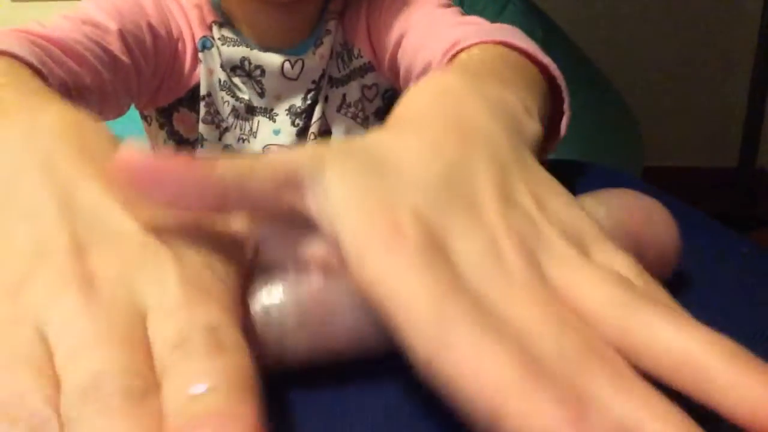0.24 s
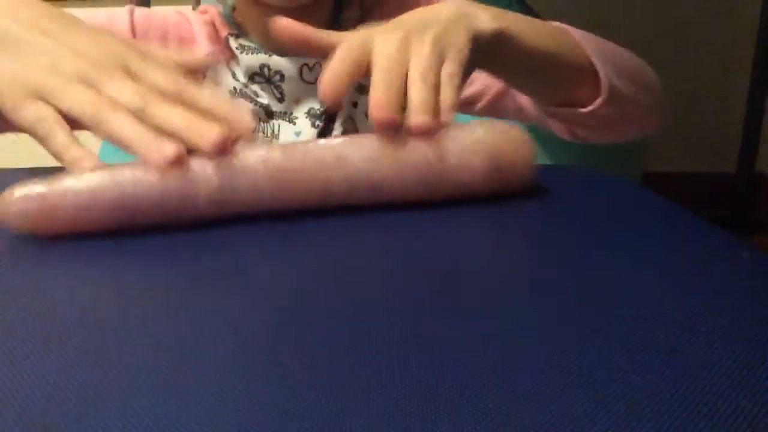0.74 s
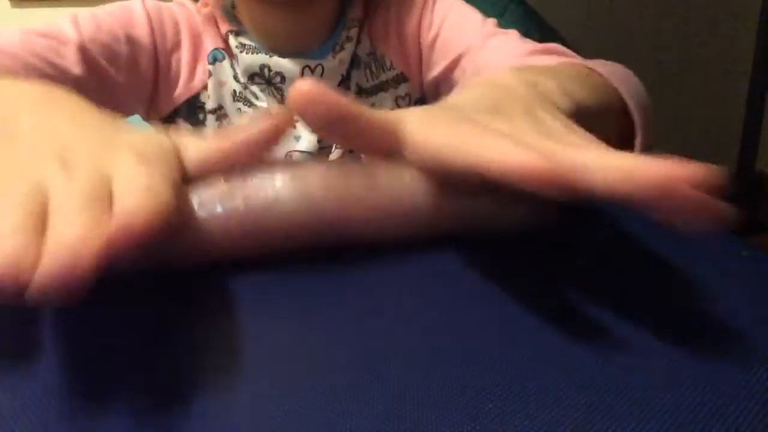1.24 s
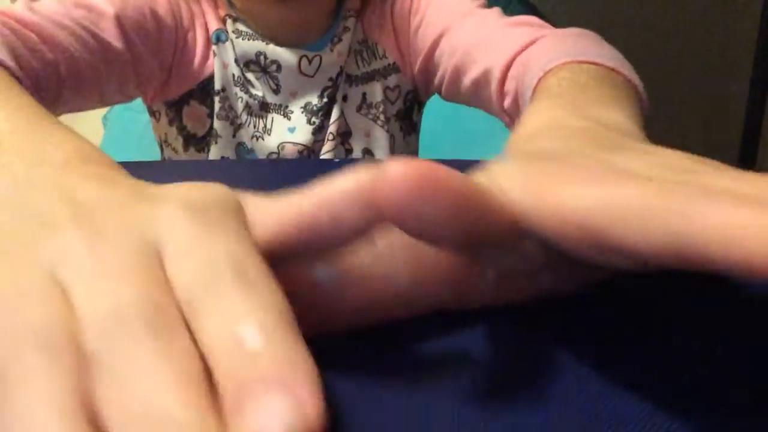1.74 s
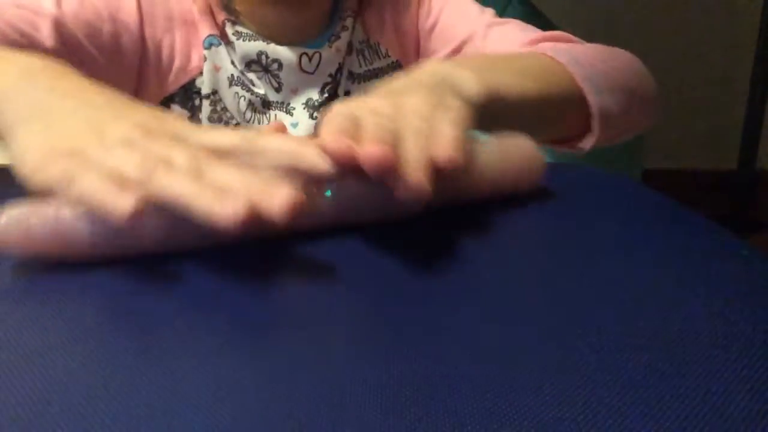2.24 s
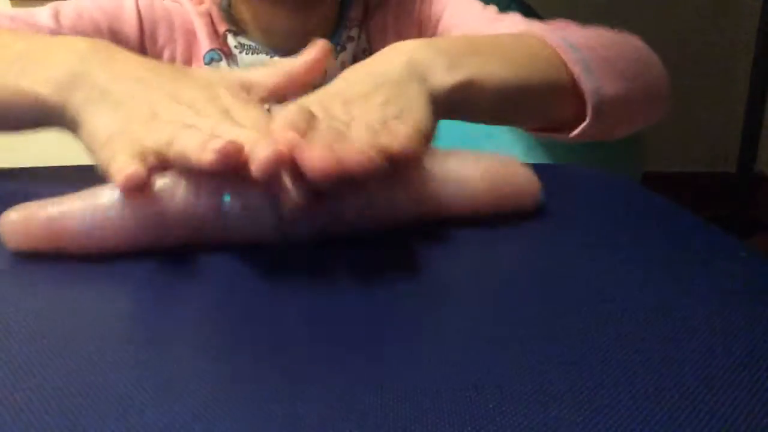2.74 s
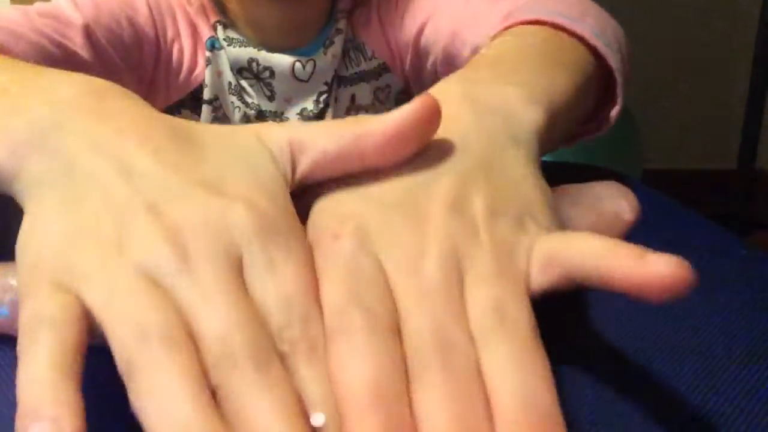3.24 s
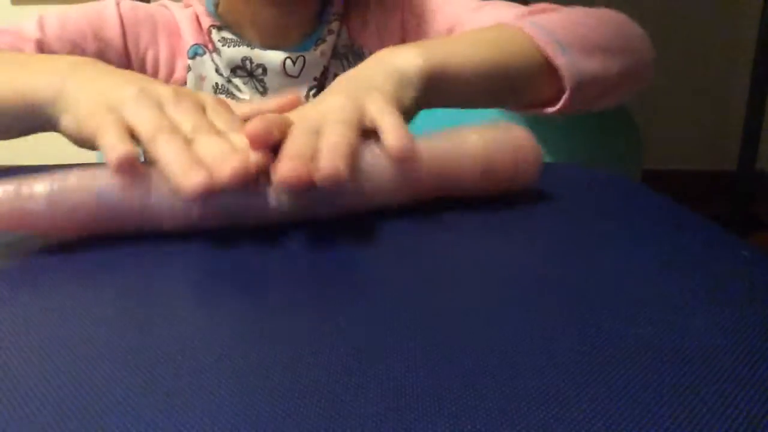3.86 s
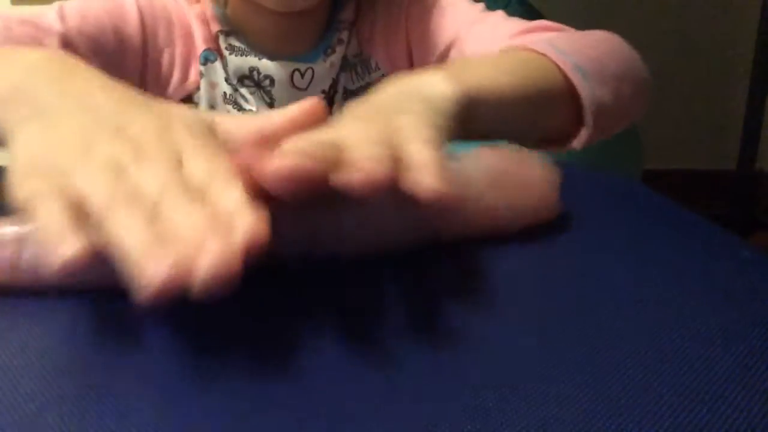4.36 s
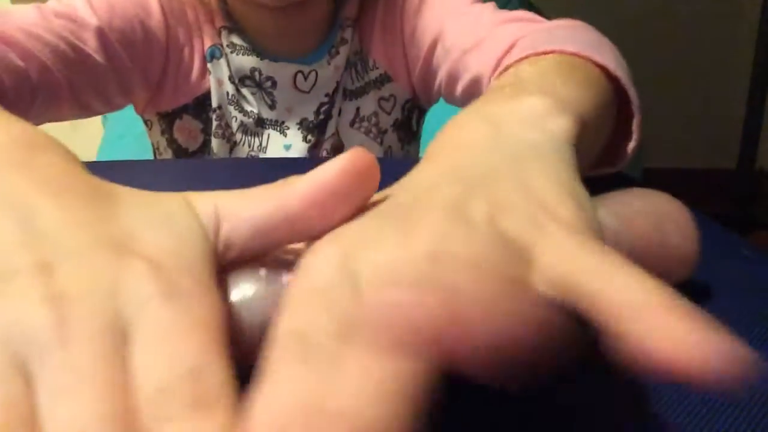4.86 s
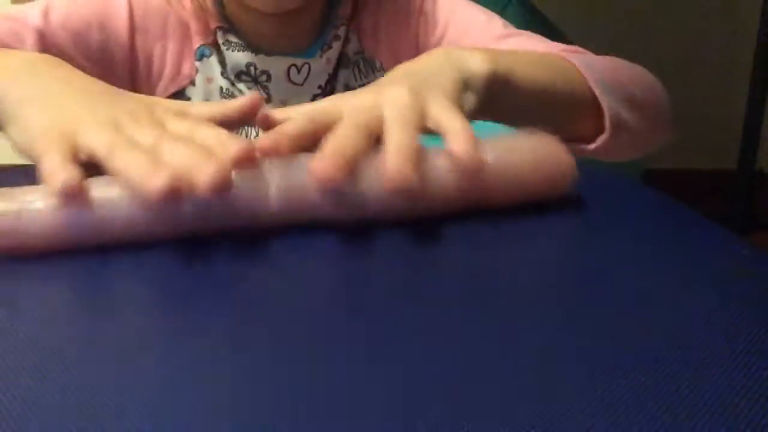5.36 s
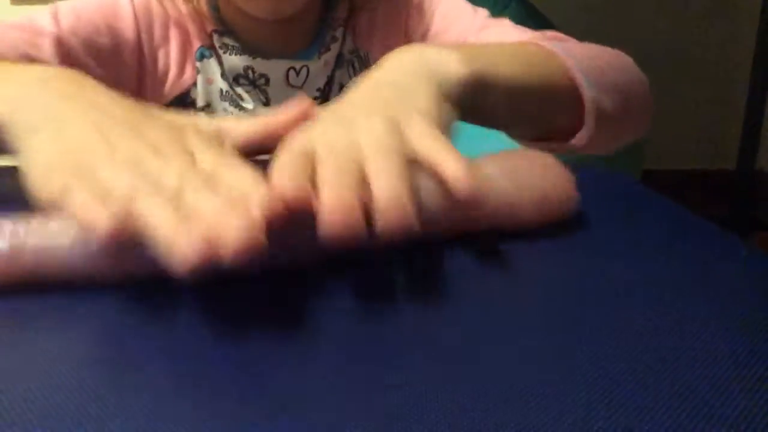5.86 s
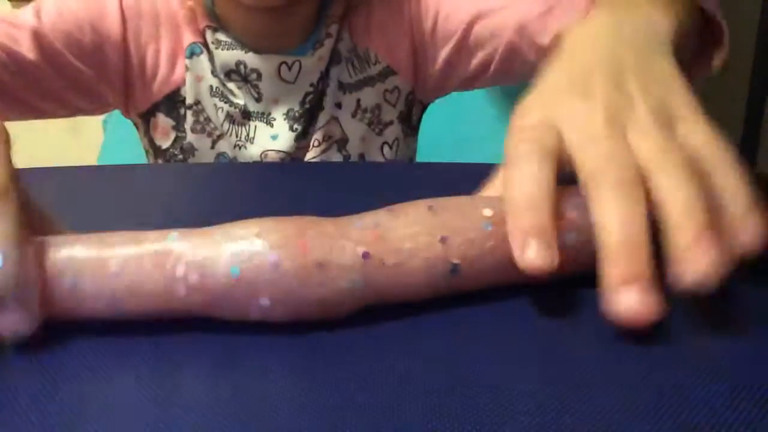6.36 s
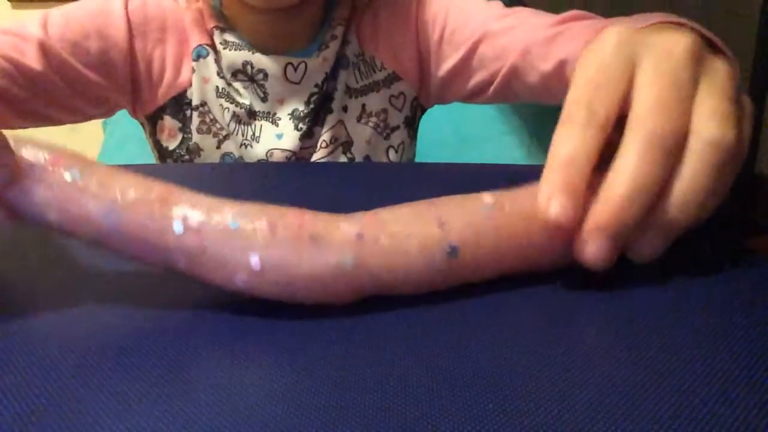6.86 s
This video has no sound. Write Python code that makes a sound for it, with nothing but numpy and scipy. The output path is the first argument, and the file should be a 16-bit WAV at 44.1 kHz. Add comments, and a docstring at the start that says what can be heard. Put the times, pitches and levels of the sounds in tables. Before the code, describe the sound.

A loud bubble snap opens, then strokes of sticky, fizzy crackle come and go as slime is rolled on a tabletop mat. Low rumble, dull palm bumps and tiny pops accompany them. Two more hard pops stand out in the middle and later part. A short rapid shudder and a last small peel end it, close and dry in a small room with faint hiss.

```python
"""Sticky slime rolled on a mat

Two hands roll a sausage of slime to and fro on a textured mat, close to a small microphone on the same table.
The peel is clumped ticks, wet smack and fizz made of filtered noise; trapped bubbles pop as bursts that ring a cavity.
The table rumbles, rustles and bumps under the hands, and near the end the lifted roll judders free in a train of slips.
A soft hush lies beneath, and the ringing microphone port colours everything."""
import sys
import numpy as np
from scipy import signal
from scipy.fft import rfft, irfft, next_fast_len
from scipy.io import wavfile
from scipy.ndimage import uniform_filter1d, map_coordinates

SR = 44100
rng = np.random.default_rng(int(sys.argv[2]) if len(sys.argv) > 2 else 0)


def wav_out(sig):
    """Save sig, one row per channel (or a flat mono array), as 16-bit PCM at SR to the path in sys.argv[1]."""
    wavfile.write(sys.argv[1], SR, np.round(np.clip(np.atleast_2d(sig).T, -1, 1) * 32767).astype(np.int16))


N = 313547  # samples

# Tone of the peel's three layers, relative spectra: freq_hz, density_db (dB per Hz)
TICK_TONE = [(3000, -39.5), (6000, -5.5), (8000, -4), (11000, 0), (13000, -2), (20000, -44.5)]
SMACK_TONE = [(1500, -45.5), (2500, 5), (4300, 0.5), (5500, 1.5), (6500, -1.5), (8000, -41.5),
              (20000, -63.5)]
FIZZ_TONE = [(8000, -63.5), (11000, -9), (13000, -2), (16000, 5.5), (20000, -17)]
USUAL_DB = -55  # ordinary peel level
# Level at the usual peel (dB), and dB gained for each dB of peel
SMACK_DB, SMACK_GROWS = -71.5, 0.67
FIZZ_DB, FIZZ_GROWS = -68.5, 0.65


def peeling():
    """Threads of slime snap off the bumps of the mat in lumps; wet smack and fine fizz share the lumps in part."""
    peel_db, wet_db, fizz_db, _ = rolling()
    surge_db = peel_db + 0.56 * wobble(20)
    lumps_db = 1.6 * wobble(260) + 1.2 * wobble(35) + 0.72 * wobble(7.6)

    tick_grain = crackle(rate=1100, spread_db=2.5, share=0.45)
    ticks = coloured(amp(lumps_db) * tick_grain, TICK_TONE)

    wet_lumps_db = 0.88 * lumps_db + 0.59 * wobble(16)
    wet_grain = crackle(rate=590, spread_db=3, share=0.23)
    wet = coloured(amp(wet_lumps_db) * wet_grain, SMACK_TONE)

    fine_grain = crackle(rate=1500, spread_db=0.5, share=0.15)
    fine = coloured(amp(0.42 * lumps_db) * fine_grain, FIZZ_TONE)

    above_usual_db = surge_db - USUAL_DB
    smack_level_db = SMACK_DB + wet_db + SMACK_GROWS * above_usual_db
    fizz_level_db = FIZZ_DB + fizz_db + FIZZ_GROWS * above_usual_db
    return amp(surge_db) * ticks + amp(smack_level_db) * wet + amp(fizz_level_db) * fine


# Stretches of the peel's level, a stroke or part of one each: time_s, peel_db
PEEL_STRETCHES = [
    [(0.0, -64.5), (0.02, -59.5), (0.15, -65.5)],
    [(0.3, -61.5), (0.39, -46.5), (0.48, -42), (0.53, -48), (0.88, -56), (0.92, -52), (0.97, -63.5)],
    [(1.08, -69), (1.11, -68.5), (1.16, -70.5)],
    [(1.24, -58.5), (1.34, -66), (1.47, -56), (1.72, -69.5)],
    [(1.86, -59), (2.02, -49.5), (2.07, -55.5), (2.22, -47.5), (2.3, -52), (2.56, -57.5)],
    [(2.58, -54.5), (2.6, -53), (2.62, -61)],
    [(2.73, -67.5), (2.89, -50.5), (2.94, -59.5), (3.04, -63.5), (3.17, -57.5), (3.22, -67), (3.38, -77)],
    [(3.55, -59.5), (3.59, -60.5), (3.66, -47.5), (3.72, -45.5), (4.01, -60.5), (4.06, -58), (4.12, -68)],
    [(4.28, -60), (4.31, -58.5), (4.35, -55)],
    [(4.37, -53.5), (4.4, -55), (4.47, -61), (4.53, -50), (4.57, -55), (4.66, -56.5), (4.83, -69)],
    [(5.0, -65), (5.07, -67), (5.23, -41.5), (5.31, -55.5), (5.39, -44), (5.5, -52.5), (5.66, -63)],
    [(5.79, -68), (5.91, -59.5), (6.08, -55.5), (6.23, -61.5)],
    [(6.24, -55.5), (6.258, -46.5), (6.285, -65.5), (6.32, -76)],
    [(6.47, -70.5), (6.6, -67.5), (6.75, -72.5), (6.9, -71.5)],
    [(6.97, -66.5), (7.03, -50), (7.056, -64)],
]
# Each stretch against the usual one: wet_smack_db, fine_fizz_db, table_weight_db
STRETCH_TOUCH = [(0, 1.5, -2.5), (0.5, 3, -1.5), (3.5, -3.5, -2), (0, -1.5, 1.5), (0.5, 1, 1), (1, 4.5, -1),
                 (0.5, 0.5, -0.5), (1.5, 0.5, 0), (3.5, -0.5, -2), (2.5, -2, 3), (0, 0, 1.5), (1, 0.5, 4),
                 (0, 6, -8), (-1.5, -2.5, 3.5), (-1.5, -1, -1)]
RISE_DB_PER_S, FALL_DB_PER_S, STILL_DB = 420, 350, -85  # slopes around a stretch; lowest level


def rolling():
    """Peel level and touch at each sample: every stretch rises, follows its course and falls."""
    t = np.arange(N) / SR
    levels = []
    for stretch in PEEL_STRETCHES:
        time_s, peel_db = np.transpose(stretch)
        before_s = np.maximum(time_s[0] - t, 0)
        after_s = np.maximum(t - time_s[-1], 0)
        course_db = np.interp(t, time_s, peel_db)
        levels.append(course_db - RISE_DB_PER_S * before_s - FALL_DB_PER_S * after_s)
    loudest = np.argmax(levels, axis=0)
    touch = uniform_filter1d(np.array(STRETCH_TOUCH, float)[loudest], size=SR // 50, axis=0)
    return np.maximum(np.max(levels, axis=0), STILL_DB), *touch.T


# Bubbles: start_s, level_db, low_cavity_hz, low_cavity_db, high_cavity_hz, high_cavity_db, snap_db, thud_db
BUBBLES = [(0.0847, -7.5, 4100, -18, 7030, -20.5, 8, -47), (0.3213, -42, 2470, -24, 6340, -21, 12, -37),
           (0.3845, -37, 2220, -18, 6230, -22, 8, -23), (0.4767, -24, 2330, -20, 6260, -26, 4, -41),
           (0.563, -27.5, 2600, -14, 5200, -16, -1, -37), (0.582, -42, 2670, -4.5, 6390, -23, 0, -33),
           (0.5955, -28.5, 2500, -6, 5200, -11, 0, -47), (0.961, -35.5, 2800, -20.5, 6190, -28, 1, -38),
           (1.2171, -49.5, 4080, -11.5, 5490, -22, -3, -30), (1.3865, -44.5, 2480, -20, 6390, -27, 2, -21),
           (1.8537, -44, 2450, -22, 6310, -18, 5, -32.5), (1.9385, -45, 2310, -24, 6440, -26, 10.5, -36),
           (1.9595, -38.5, 3020, -11.5, 6260, -27, -3, -41), (1.9739, -37, 2900, -6, 6500, -27, 0, -35),
           (1.9883, -29.5, 3070, -13, 6490, -27, 6.5, -32), (1.9994, -38, 3020, -7.5, 5570, -25, 11, -38),
           (2.0141, -34, 2260, -24, 6500, -26, 7, -29), (2.0339, -32.5, 2950, -30, 6470, -26, 8, -45),
           (2.9806, -44.5, 2200, -12, 5490, -18, 1, -20), (3.1499, -49.5, 2860, -15, 6340, -6, 10, -14.5),
           (3.181, -28, 2340, -27, 6400, -22.5, 7.5, -34.5), (3.6338, -35, 2420, -17, 6450, -21, -1, -34),
           (3.6884, -31, 2300, -21, 6400, -8, 4, -34), (3.7345, -29, 4030, -30, 6600, -11, 1, -45),
           (3.7805, -34.5, 3150, -27, 6400, -7.5, 3, -36), (3.7952, -32, 2480, -20, 6450, -11, 5, -32),
           (4.2729, -48.5, 2780, -8, 4850, -11, 7.5, -20), (4.302, -41, 2780, -16, 5040, -3, -2, -30),
           (4.49, -7, 2750, -30, 5430, -19, -3, -43), (5.402, -2, 4600, -15, 6140, -15, -4.5, -39),
           (5.403, -3.5, 2645, -8.5, 5360, 0, -17.5, -33), (6.1031, -38, 2630, -24, 6420, -22.5, -5, -25),
           (6.2529, -34.5, 2940, -29, 5860, -34, 10.5, -27.5),
           (7.0229, -51, 2880, -26, 6030, -18, 5.5, -23), (7.0524, -34.5, 2640, -29.5, 6480, -19.5, 7, -32)]
# Table top under a pop: freq_hz, level_db, t60_s
TABLE_KNOCK = [(251, 3, 0.051), (343.6, 2, 0.072), (520, -1.5, 0.087), (754, 0, 0.051), (1014, 7.5, 0.015),
               (1480, 9.5, 0.0062)]
TEAR_S = 0.00087  # time constant of the tearing skin's bell-shaped fade


def pops():
    """Skin tears in a brief crack and rings the opened cavity; the table takes a thud."""
    out, t = np.zeros(N), np.arange(SR // 8) / SR
    lead_s = 0.007  # quiet lead-in before the crack
    tear_at = round(lead_s * SR)
    for start_s, level_db, low_hz, low_db, high_hz, high_db, snap_db, thud_db in BUBBLES + stray_pops(count=30):
        lead_in = 0.073 * np.exp((t - lead_s) / 0.0016)
        tear = np.exp(-((t - lead_s) / TEAR_S) ** 2)
        burst = np.where(t < lead_s, lead_in, tear) * rng.standard_normal(len(t))
        burst[tear_at] = 1.5  # a fixed spike marks the rupture
        burst /= np.linalg.norm(burst)

        cavity = np.zeros(len(t))
        # freq_hz, level_db, cycles to fall 60 dB
        for hz, db, cycles in [(low_hz, low_db, 16), (high_hz, high_db, 15), (9200, -14, 8), (13200, snap_db, 7)]:
            onset = (1 - np.exp(-t * hz / 0.59)) ** 2
            cavity += amp(db - 60 * t * hz / cycles) * onset * np.sin(2 * np.pi * hz * t)

        board = np.zeros(len(t))
        for hz, db, t60_s in TABLE_KNOCK:
            board += amp(db + rng.normal(0, 1.5) - 60 * t / t60_s) * np.sin(2 * np.pi * hz * t)
        thud = np.roll(amp(thud_db) * board * (1 - np.exp(-t / 0.00078)), tear_at)

        crack = signal.fftconvolve(burst, cavity)[:len(t)]
        pop = np.pad(amp(level_db) * (crack + thud), (0, SR // 6))  # space for the room
        spot = out[round((start_s - lead_s) * SR):][:len(pop)]
        spot += (pop + room(pop))[:len(spot)]
    return out


# Typical stray bubble: over_peel_db, low_cavity_hz, low_cavity_db, high_cavity_hz, high_cavity_db, snap_db, thud_db
STRAY_BUBBLE = (12, 2600, -26, 6299.5, -30, 8, -26.5)


def stray_pops(count):
    """Bubbles burst at chance moments, their level following the peel; rows are laid out as in BUBBLES."""
    over_db, low_hz, low_db, high_hz, *rest = STRAY_BUBBLE
    peel_db = rolling()[0]
    when = rng.uniform(0.022, 0.81, count) * N
    chance = rng.standard_normal((count, 4))
    rows = []
    for at, (a, b, c, d) in zip(when, chance):
        level_db = peel_db[int(at)] + over_db + 3 * a
        low = low_hz * np.exp(0.12 * b)
        high = high_hz * np.exp(0.044 * d)
        rows.append((at / SR, level_db, low, low_db + 5 * c, high, *rest))
    return rows


# Table top and roll under a slip: freq_hz, width_hz, level_db
SLIP_MODES = [(211, 28, 5), (470, 198, -3), (1020, 800, -10), (1850, 1000, -36), (3350, 440, -29),
              (5420, 1100, -22), (14470, 2000, -25.5)]
JUDDER_S, SLIP_S, SLIP_SCATTER_S = 6.6325, 0.0112, 0.0005  # first slip, spacing, scatter of each slip
SWELL_S, SWELL_DB, SWELL_HALF_S = 6.682, -26, 0.029  # centre of the swell, its level, time from it to 6 dB less


def judder():
    """The roll lets go in a train of slips: threads stretch and crackle, then the release pushes the table top."""
    push, t = np.zeros(N), np.arange(-SR // 100, SR // 100) / SR
    slips_s = JUDDER_S + SLIP_S * np.arange(8) + SLIP_SCATTER_S * rng.standard_normal(8)
    for slip_s in slips_s:
        level_db = SWELL_DB - 6 * ((slip_s - SWELL_S) / SWELL_HALF_S) ** 2 + rng.normal(0, 2.3)
        strain_shape = np.where(t < 0, np.exp(t / 0.0047), np.exp(-t / 0.0012))
        strain = strain_shape * rng.standard_normal(len(t))
        release = -1.2 * np.exp(-(t / 0.00055) ** 2)
        push[round(slip_s * SR) - SR // 100:][:len(t)] += amp(level_db) * (strain + release)

    def modes(f):
        """Sum of band resonances with alternating sign."""
        total = 0
        for k, (centre, width, db) in enumerate(SLIP_MODES):
            total = total + (-1) ** k * amp(db) * 1j * f * width / (centre ** 2 - f ** 2 + 1j * f * width)
        return total

    shake = filtered(push, modes)
    return shake + room(shake)


# Tone of the table's rumble and the mat's rustle, relative spectra: freq_hz, density_db (dB per Hz)
RUMBLE_TONE = [(15, -84.5), (25, -57.5), (67, -1.5), (102, 5.5), (124, -1), (162, -7.5), (248, -8),
               (500, -25.5), (650, -46), (1100, -120)]
RUB_TONE = [(150, -27.5), (350, -1), (700, -4), (1300, -5.5), (2200, -11.5), (4000, -27.5), (8000, -68.5)]
# Palms meeting the table: start_s, level_db, pitch_hz, t60_s
PALM_BUMPS = [(0.468, -41.5, 114, 0.21), (0.499, -42, 87, 0.14), (1.187, -33, 80, 0.07),
              (1.424, -43, 73, 0.1), (1.475, -40, 70.6, 0.1), (1.787, -45, 87.6, 0.2),
              (2.189, -39.5, 86, 0.22), (2.134, -43, 108, 0.13), (2.215, -41.5, 235, 0.06),
              (3.125, -46, 105, 0.13), (3.314, -44, 145, 0.18), (4.325, -47, 94.5, 0.18),
              (5.116, -38.5, 108, 0.14), (5.938, -33.5, 198, 0.066)]
# Level at the usual peel (dB), and dB gained for each dB of peel
RUMBLE_DB, RUMBLE_GROWS = -61.5, 0.21
RUB_DB, RUB_GROWS = -68.5, 0.48


def table():
    """The table rumbles under the hands, the mat rustles, and palms bump the top as decaying sines."""
    peel_db, *_, weight_db = rolling()
    above_usual_db = peel_db - USUAL_DB
    rumble_db = RUMBLE_DB + weight_db + RUMBLE_GROWS * above_usual_db
    rub_db = RUB_DB + 0.17 * weight_db + RUB_GROWS * above_usual_db
    out = amp(rumble_db + 3 * wobble(13)) * coloured(rng.standard_normal(N), RUMBLE_TONE)
    rustle = coloured(crackle(rate=300, spread_db=3.5, share=0.2), RUB_TONE)
    out += amp(rub_db + 1.4 * wobble(18)) * rustle

    t = np.arange(SR // 4) / SR
    onset = 1 - np.exp(-t / 0.0055)
    for start_s, level_db, pitch_hz, t60_s in PALM_BUMPS:
        bump = amp(level_db - 60 * t / max(t60_s, 0.01)) * np.sin(2 * np.pi * pitch_hz * t) * onset
        out[round(start_s * SR):][:len(t)] += bump
    return out


# Decay of the room's tail: freq_hz, t60_s
ROOM_DECAY = [(200, 0.3), (1000, 0.24), (5000, 0.15), (12000, 0.098)]


def room(x):
    """Nearby surfaces answer within 2 ms; each frequency of the later tail dies at its own speed."""
    _, t, z = signal.stft(rng.standard_normal(SR // 4), SR, nperseg=256)
    hz = np.fft.rfftfreq(256, 1 / SR)
    decay = amp(-60 * t / along(ROOM_DECAY, hz)[:, None])
    tail = signal.istft(z * decay, SR, nperseg=256)[1]
    late = signal.fftconvolve(np.pad(x, (200, 0)), tail / np.linalg.norm(tail))[:len(x)]

    near_n = SR // 50
    near_fade = amp(-60 * np.arange(near_n) / SR / 0.014)
    near = unit(rng.standard_normal(near_n) * near_fade) / np.sqrt(near_n)
    early = signal.fftconvolve(np.pad(x, (70, 0)), near)[:len(x)]
    return amp(-14.5) * late + amp(-12.5) * early


# Tone of the background, relative spectrum: freq_hz, density_db (dB per Hz)
AIR_TONE = [(15, -42.5), (25, -24.5), (63, 1), (92, 2), (167, -6), (349, -7.5), (900, -23), (1980, -31.5),
            (2600, -36), (7000, -49), (9000, -64), (12000, -46), (16000, -37), (21000, -40)]


def air():
    """The hush of the room and the microphone's own hiss: shaped noise with a gently wavering level."""
    hush = coloured(patchy(rng.standard_normal(N), depth_db=1.5), AIR_TONE)
    return amp(-61.5 + 2.5 * wobble(6)) * hush


# Microphone resonances: freq_hz, width_hz
PORT_MODES = [(8400, 1320), (9500, 1300)]


def port(hz):
    """The air in the microphone port: flat below, ringing at its resonances, falling above."""
    return np.prod([c * c / (c * c - hz * hz + 1j * hz * width) for c, width in PORT_MODES], axis=0)


def crackle(rate, spread_db, share):
    """Patchy noise mixed with sparse ticks of uneven size that come in clumps."""
    chance = rate / SR * amp(8.7 * wobble(25))
    hits = (rng.random(N) < chance) * rng.choice([-1, 1], N)
    ticks = hits * amp(spread_db * np.minimum(rng.exponential(size=N), 5))
    share = np.clip(share, 0, 1)  # part of the power given to ticks
    mix = np.sqrt(share) * unit(ticks) + np.sqrt(1 - share) * rng.standard_normal(N)
    return patchy(mix, depth_db=2.5)


def patchy(x, depth_db):
    """x with random patches of gain, a few hundred Hz wide and some 40 ms long."""
    z = signal.stft(x, nperseg=512)[2]
    field = uniform_filter1d(rng.standard_normal(z.shape), size=3, axis=0)
    field = uniform_filter1d(field, size=7, axis=1)
    return signal.istft(z * amp(depth_db * unit(field)), nperseg=512)[1][:N]


def coloured(x, spectrum):
    """x given a spectrum, at rms 1 once it has passed the port."""
    x = filtered(x, lambda hz: amp(along(spectrum, hz)))
    return x / np.std(filtered(x, port))


def filtered(x, response):
    """x shaped by a complex response of frequency."""
    m = next_fast_len(N + SR // 2)
    return irfft(rfft(x, m) * response(np.fft.rfftfreq(m, 1 / SR)), m)[..., :N]


def wobble(rate):
    """A smooth random curve, rate knots a second."""
    knots = rng.standard_normal(int(N * rate / SR) + 4)
    return map_coordinates(knots, [np.arange(N) * rate / SR])


def along(points, hz):
    """Value at hz between (Hz, value) points on a log axis."""
    f, v = np.transpose(points)
    return np.interp(np.log(hz + 1), np.log(f + 1), v)


def amp(db):
    """dB to gain."""
    return 10 ** (np.asarray(db) / 20)


def unit(x):
    """x scaled to rms 1."""
    return x / np.sqrt(np.mean(x ** 2) + 1e-20)


def scene():
    """Everything that reaches the microphone, as one channel."""
    return (pops() + judder() + peeling() + table() + air())[None]


TOP_HZ = 15900  # band limit


def record(dry):
    """The port rings, and nothing is kept above the band limit."""
    return filtered(dry, lambda hz: port(hz) * (hz < TOP_HZ))


dry = scene()
out = record(dry)
wav_out(out)
```